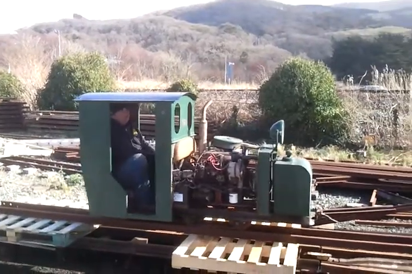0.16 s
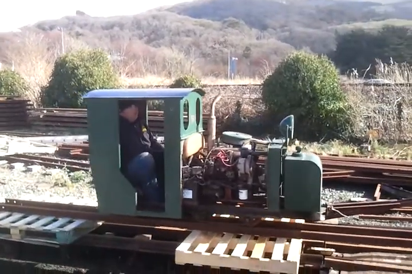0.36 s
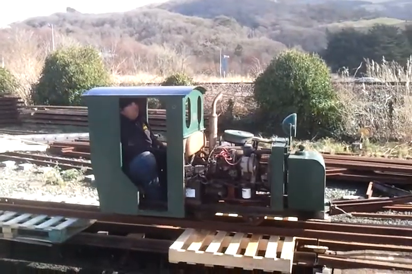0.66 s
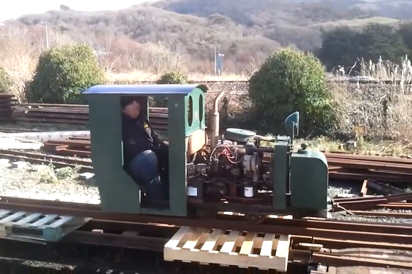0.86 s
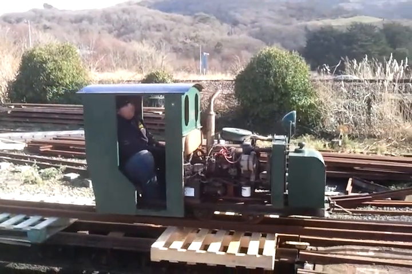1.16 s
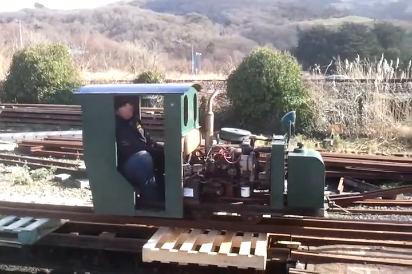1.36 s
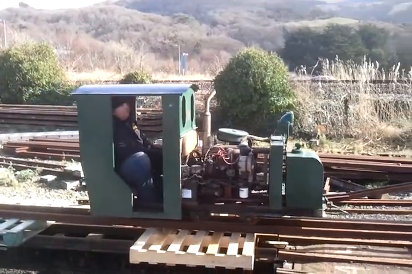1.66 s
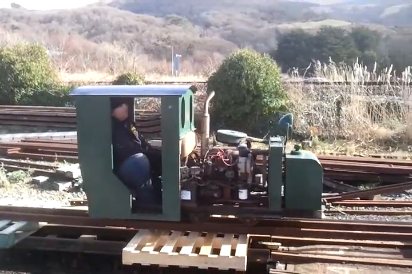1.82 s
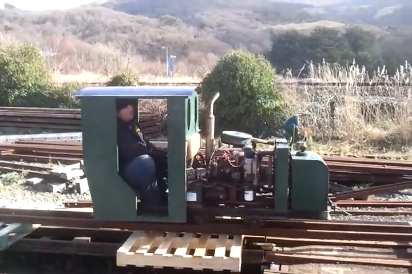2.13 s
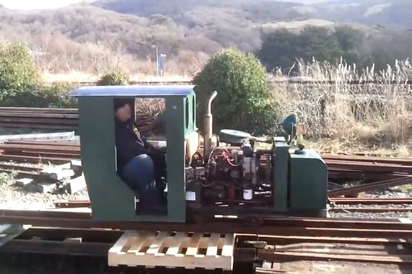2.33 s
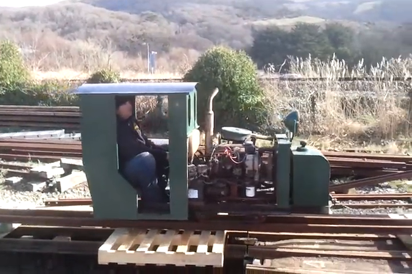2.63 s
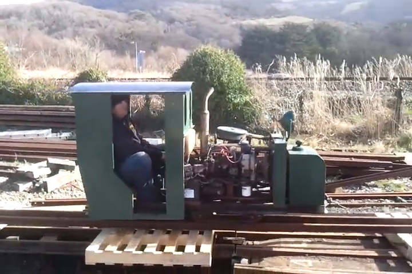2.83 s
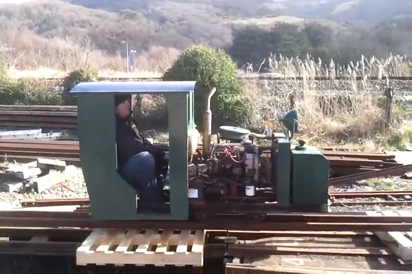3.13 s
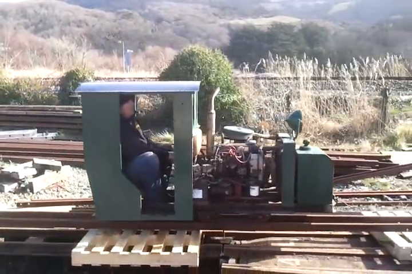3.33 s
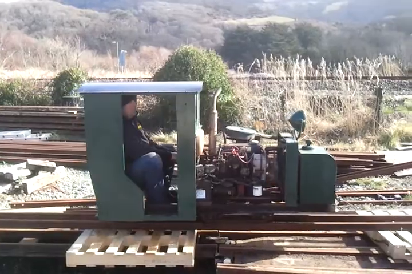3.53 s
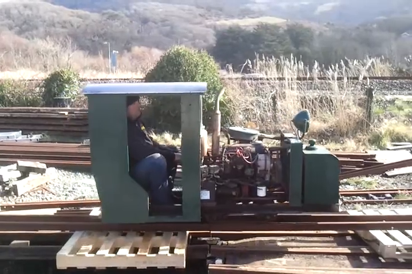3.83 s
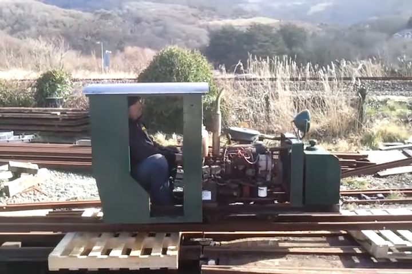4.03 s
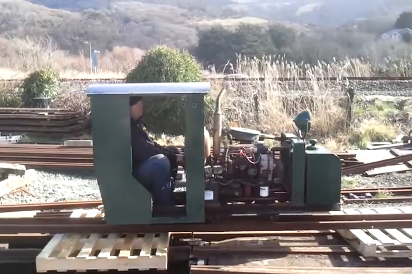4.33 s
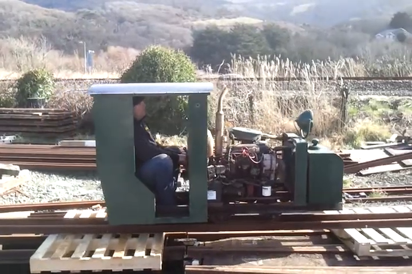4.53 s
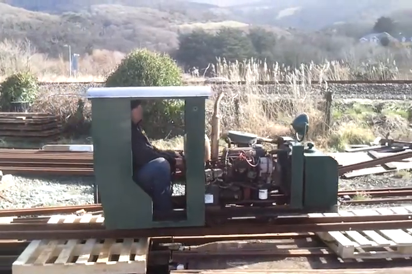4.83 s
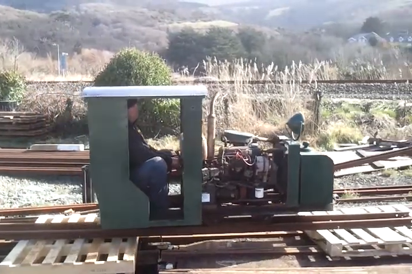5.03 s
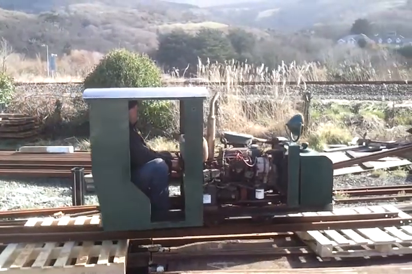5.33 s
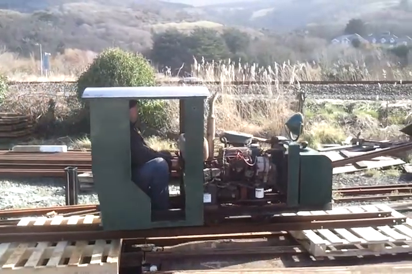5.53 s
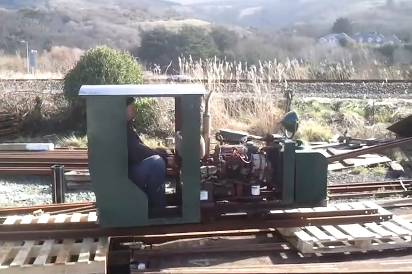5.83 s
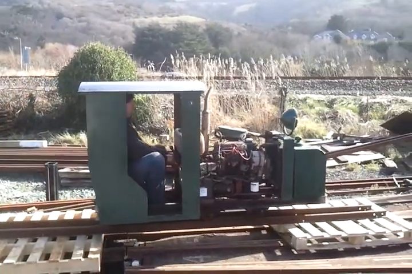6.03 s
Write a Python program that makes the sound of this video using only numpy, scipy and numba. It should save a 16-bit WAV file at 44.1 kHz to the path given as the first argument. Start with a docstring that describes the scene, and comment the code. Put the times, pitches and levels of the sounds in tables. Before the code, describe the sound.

Outdoors in a rail yard, a small diesel locomotive creeps along a few metres from a hand-held microphone. Its low exhaust hum throbs steadily, with mechanical hiss and a hollow metallic knock about sixteen times a second. Small ticks open the scene, and a distant bird chirps twice early on. Wind is light at first, then thumps the microphone from about four seconds, hardest at the end.

```python
"""Diesel locomotive creeping through a rail yard

A small diesel locomotive passes a few metres from a hand-held microphone. Its exhaust hum is a sum of
cosines on the engine's orders, a part that knocks once a cycle is struck resonance, and hiss is shaped noise.
Short ticks, scrapes and clinks ring single modes; a far bird is a frequency-modulated whistle.
Wind is low-passed noise with pressure jumps, hardest at the end."""
import sys
import numpy as np
from scipy import signal
from scipy.fft import rfft, irfft, next_fast_len
from scipy.io import wavfile
from scipy.ndimage import uniform_filter1d
from numba import njit

SR = 44100
rng = np.random.default_rng(int(sys.argv[2]) if len(sys.argv) > 2 else 0)


def persist_wave(psi):
    """Save psi, clipped to +-1, as 16-bit WAV."""
    counts = np.round(np.clip(psi, -1, 1) * 32767).astype(np.int16)
    wavfile.write(sys.argv[1], SR, np.atleast_2d(counts).T)


N = 272097  # length [samples]


def undb(db):
    """Decibel law: amplitude gain of a level in dB."""
    return 10 ** (np.asarray(db) / 20)


def curves(table):
    """Linear interpolation: the columns of a table, joined by straight lines in time."""
    s, *columns = np.transpose(table)
    return [np.interp(np.arange(N) / SR, s, column) for column in columns]


def unit(x):
    """Normalization of a signal to rms 1."""
    return x / np.sqrt(np.mean(x ** 2))


def walk(rate):
    """Slow random modulation: values held 1 / rate s, smoothed by two moving averages, rms 1."""
    hold = int(SR / rate)
    steps = np.repeat(rng.standard_normal(N // hold + 1), hold)
    smooth = uniform_filter1d(uniform_filter1d(steps, hold), hold)
    return unit(smooth[:N])


def ring(blows, hz, t60, contact_s):
    """Damped resonance of moving pitch; a finite contact time makes the ring build up."""
    turn = np.exp(2j * np.pi * np.cumsum(hz) / SR)
    contact = np.hanning(int(contact_s * SR))
    push = np.convolve(blows / turn, contact / contact.sum())[:N]
    decay = np.exp(-np.log(1000) / (t60 * SR))
    return (turn * signal.lfilter([1], [1, -decay], push)).imag


def band(x, hz, width):
    """Resonant band-pass, gain 1 at the centre."""
    return signal.lfilter(*signal.iirpeak(hz, hz / width, fs=SR), x)


@njit
def lowpass(x, hz, damping):
    """State-variable low-pass whose edge moves every sample."""
    y, b, l = np.empty(len(x)), 0., 0.
    for i in range(len(x)):
        g = np.tan(np.pi * hz[i] / SR)
        v = (b + g * (x[i] - l)) / (1 + g * (g + damping))
        y[i] = l + g * v
        b, l = 2 * v - b, 2 * y[i] - l
    return y


def colour(x, table):
    """Spectral shaping by (frequency [Hz], gain [dB]) points, joined over log frequency."""
    size = next_fast_len(N)
    hz, db = np.transpose(table)
    bins_hz = np.arange(size // 2 + 1) * SR / size
    gain = undb(np.interp(np.log(bins_hz + 1), np.log(hz), db))
    return irfft(rfft(x, size) * gain, size)[:N]


# Gusts on the microphone: (middle [s], length [s], level [dB], top of the rumble [Hz])
GUST_SWELLS = [(.005, 0.095, -31.5, 80.6), (.105, 0.12, -24, 65), (0.619, 0.11, -37, 38),
               (3.27, 0.23, -37.5, 50), (3.44, 0.11, -27.5, 41.5), (3.573, 0.11, -35, 50),
               (4.112, 0.07, -25.5, 45.2), (4.242, 0.1, -25, 40), (4.31, 0.073, -30, 80),
               (4.418, 0.14, -27.5, 105), (4.513, 0.095, -18.5, 71), (4.581, 0.065, -26, 45),
               (4.647, 0.061, -31.5, 89), (4.79, 0.19, -27, 60), (4.962, 0.33, -27.5, 119),
               (5.22, 0.066, -20, 60), (5.335, 0.16, -26.5, 60), (5.459, 0.24, -26.5, 70),
               (5.708, 0.3, -29.5, 55), (5.846, 0.19, -28, 149), (5.94, 0.11, -19, 126),
               (6.029, 0.048, -23, 170), (6.072, 0.12, -24.5, 122), (6.115, 0.053, -21, 161),
               (6.16, 0.19, -17.5, 90)]
# The light air between gusts
AIR_DB, AIR_TOP_HZ, AIR_WALK_DB = -47, 92, 2


def gusts():
    """Addition of powers: gusts swell over the light air, and the power-weighted mean sets the rumble top."""
    t = np.arange(N) / SR
    power = undb(2 * (AIR_DB + AIR_WALK_DB * walk(2.88)))
    weighted_hz = power * AIR_TOP_HZ
    for s, length, db, top_hz in GUST_SWELLS:
        swell = undb(2 * db) * np.cos(np.pi * np.clip((t - s) / length, -.5, .5)) ** 2
        power = power + swell
        weighted_hz = weighted_hz + swell * top_hz
    return np.sqrt(power), np.clip(weighted_hz / power, 35, 900)


# Single eddies placed by hand: strong pressure jumps, some with a faint sharp snap on them:
# (time [s], level [dB], time scale of the pressure jump [ms], signed amplitude factor, positive upwards)
PLACED_EDDIES = [(.1185, -19.5, 5.4, -0.88), (4.208, -18.5, 8, 1), (4.3847, -23.3, 2.6, -1.2),
                 (4.4072, -15, 3.3, 1), (4.445, -14.5, 2.5, -1), (4.5127, -22, 1.6, -1),
                 (4.5129, -32, .65, -1), (4.514, -7, 9, -1.08), (4.5672, -13.5, 5.6, 0.92),
                 (4.7547, -12.5, 7.5, 1), (4.804, -12.5, 3.7, 0.88), (4.9242, -17.8, 5.6, 1),
                 (4.939, -16, 2, -1.1), (4.9385, -35, .7, -1), (4.9559, -13.5, 5.3, 1),
                 (4.97, -15, 2.6, -1), (4.9885, -18, 1.7, -1), (5.1404, -23, 2.2, -1),
                 (5.2235, -19, 2.3, -1), (5.2305, -11.5, 7.3, -0.88), (5.2873, -20, 5, 1),
                 (5.3264, -23, 3.8, -1.1), (5.4144, -18, 2.4, 0.94), (5.4145, -31, .7, 1),
                 (5.4885, -23, 3.2, 0.81), (5.8, -15.5, 2.6, -1.08), (5.8203, -15, 2.2, -1.1),
                 (5.837, -17, 3.6, 1), (5.885, -18.5, 2.9, 0.91), (5.916, -16, 3.2, -0.86),
                 (5.9227, -5, 6.6, 1), (5.935, -11, 2.6, -1.2), (5.9407, -7.5, 2.5, 1),
                 (5.9536, -3, 2.52, -0.84), (5.9537, -26, .7, -1), (6.0235, -15, 1.8, 1),
                 (6.0326, -10.5, 3.5, -0.95), (6.0525, -13, 3.7, -1), (6.0623, -8.5, 3.9, 1),
                 (6.0757, -16, 3.9, 1), (6.095, -10.5, 2.9, -1), (6.1066, -5.5, 4.4, -1.3),
                 (6.1411, -10.5, 3.2, 0.95), (6.1599, -13, 4.8, -1)]
# Small eddies come by chance: level relative to the gust, mean time scale at a rumble top of 95 Hz
SMALL_EDDIES_PER_S, SMALL_EDDY_DB, SMALL_EDDY_MS = 12, 1.5, 2.6
# Sharp gusts flutter above their rumble
FLUTTER_DB, FLUTTER_HZ, FLUTTER_FROM_HZ = -5, (220, 380), 72.6


def wind():
    """Turbulence: low-passed noise, brighter in sharp gusts, and single eddies as pressure jumps."""
    strength, top_hz = gusts()
    high_pass = signal.butter(2, 21, "high", fs=SR, output="sos")
    air = signal.sosfilt(high_pass, rng.standard_normal(N))
    # the gain offsets the power lost to a lower edge
    rumble = lowpass(lowpass(air, top_hz, 1.0), 3.96 * top_hz, 1.5) * np.sqrt(SR / 2 / top_hz)
    throb_db = 2.6 * walk(40)
    flutter_band = signal.butter(3, FLUTTER_HZ, "band", fs=SR, output="sos")
    flutter = unit(signal.sosfilt(flutter_band, air)) * undb(FLUTTER_DB + 3.8 * walk(70))
    sharpness = np.clip(top_hz / FLUTTER_FROM_HZ - 1, 0, 1)
    out = (rumble * undb(throb_db) + flutter * sharpness) * strength

    when, length = rng.random((int(SMALL_EDDIES_PER_S * N / SR), 2)).T
    when = .06 + when * (N / SR - .07)
    then = (when * SR).astype(int)
    small_db = 20 * np.log10(strength[then]) + SMALL_EDDY_DB
    # a dull gust carries slower eddies
    small_ms = SMALL_EDDY_MS * (.5 + length) * 95 / top_hz[then]
    small_way = np.sign(rng.standard_normal(len(when)))
    small = zip(when, small_db, small_ms, small_way)

    t = np.arange(-SR // 20, SR // 20) / SR
    for s, peak_db, jump_ms, way in list(PLACED_EDDIES) + list(small):
        # pressure builds, flips quickly and relaxes
        u = t * 1000 / jump_ms
        jump = np.tanh(u / 0.51) * np.exp(-(u / 0.61) ** 2)
        at = int(s * SR) - SR // 20
        out[at:at + len(t)] += (way * undb(peak_db) * jump / jump.max())[:N - at]
    return out


# Notes of a far bird: (time [s], length [s], pitch [Hz], level [dB])
BIRD_NOTES = [(1.443, 0.075, 4160, -61), (1.698, 0.076, 4150, -55), (5.172, .055, 4190, -62),
              (5.236, 0.058, 4150, -62.5)]
SLIDE_UP_HZ, SLIDE_S = 330, .009  # each note slides up into its pitch


def bird():
    """Frequency modulation: short whistles with a quick warble."""
    out = np.zeros(N)
    for s, length, hz, db in BIRD_NOTES:
        t = np.arange(int(length * SR)) / SR
        slide = SLIDE_UP_HZ * SLIDE_S * np.exp(-t / SLIDE_S)
        warble = 0.96 * np.sin(2 * np.pi * 45 * t)
        whistle = np.sin(2 * np.pi * (hz * t + slide + warble))
        envelope = np.sin(np.pi * t / length) ** .5 * undb(2.7 * walk(90)[:len(t)])
        out[int(s * SR):int(s * SR) + len(t)] += undb(db) * whistle * envelope
    return out


# Short high ticks and scrapes, a cluster of them at the very start, and ringing clinks:
# (time [s], tone level [dB], mode [Hz], decay time t60 [s], scrape level relative to the tone [dB])
TICKS_AND_CLINKS = [(0.013, -51.5, 10755, 0.33, 5), (.008, -43, 11800, 0.01079, 4),
                    (0.013, -52.5, 5800, 0.1046, 9.5), (0.051, -48, 8700, .02, 6),
                    (.074, -46.5, 4820, .03, 5.5), (.83, -48.5, 614, 0.94, -6), (2.289, -46, 2090, 0.04, 4),
                    (3.953, -48, 5541, 0.0343, -6), (4.065, -44, 2811, .05, -8),
                    (4.191, -48, 2179, 0.11, 13), (5.386, -43, 5230, 0.04, -8),
                    (5.387, -38.5, 4980, 0.04, -8), (5.393, -39, 5030, 0.039, -11),
                    (5.391, -51, 1880, 0.12, 17), (5.391, -62, 6000, 0.1305, -3), (5.46, -52, 5000, .08, 2),
                    (5.462, -62, 2300, .12, 17), (5.465, -51.5, 2985, 0.19, 7), (5.51, -59, 3700, .12, 0),
                    (5.547, -54, 5000, .04, 2), (5.55, -59, 2210, .1, 16), (5.553, -55, 2970, .07, 0),
                    (5.64, -52, 11060, .02, -6)]


def clinks():
    """Modal excitation: each tick is a decaying mode with a short scrape of noise around it."""
    out = np.zeros(N)
    for s, peak_db, hz, t60, scrape_db in TICKS_AND_CLINKS:
        t = np.arange(int(t60 * SR)) / SR
        scrape = undb(scrape_db) * rng.standard_normal(SR)[:len(t)] * np.exp(-t / min(0.32 * t60, .025))
        scrape = band(band(scrape, hz, 0.83 * hz), hz, 0.83 * hz)
        tone = np.sin(2 * np.pi * hz * t) * np.exp(-np.log(1000) * t / t60)
        out[int(s * SR):int(s * SR) + len(t)] += undb(peak_db) * (tone + scrape)
    return out


# Engine speed: (time [s], rate [engine cycles per second])
ENGINE_SPEED = [(0, 16.4), (.56, 16.2), (.66, 15.67), (.8, 15.68), (1.15, 15.968), (1.5, 16.449),
                (2, 16.779), (2.5, 16.864), (3, 16.644), (3.5, 16.83), (4, 16.77), (4.4, 16.705),
                (4.75, 16.701), (5.1, 16.553), (5.35, 17.338), (5.6, 17.785), (5.9, 17.9), (6.17, 18)]
START_CYCLE = .723  # phase before the first sample [cycles]


def engine_cycle():
    """Phase as the integral of frequency: engine cycles turned so far."""
    return START_CYCLE + np.cumsum(curves(ENGINE_SPEED)[0]) / SR


# Spectrum of engine hiss and clatter: (frequency [Hz], relative density [dB per Hz])
HISS_SPECTRUM = [(110, -7), (160, -9.5), (300, -10.5), (440, -17.5), (1050, -24.5), (2500, -31),
                 (3400, -37), (6100, -28.5), (6700, -33), (7800, -34), (8500, -41), (10300, -37.5),
                 (11500, -40.5), (12100, -51.5), (14500, -58)]
# Broad casing resonances in the hiss: (centre [Hz], width [Hz], relative level [dB])
CASING_MODES = [(530, 92, -13), (653, 81, -9), (1420, 226, -9), (1598, 140, -11.5), (2136, 190, -12),
                (2446, 100, -17)]
# Valve and injector ticks that lift the treble: (share of the cycle [1], mean lift [dB])
VALVE_TICKS = [(.08, 2), (0.251, 5.5), (0.399, 3.5), (.92, 4.5)]
TICK_FADE_CYCLES = 0.088


def hiss(cycle):
    """Amplitude-modulated noise: gritty bands flicker separately and valve ticks lift the treble."""
    tick_db = 0
    for share, lift_db in VALVE_TICKS:
        # every tick has its own strength
        strengths = .4 + 1.2 * rng.random(N // 1000)
        strength = strengths[np.floor(cycle - share + 1).astype(int)]
        tick_db = tick_db + strength * lift_db * np.exp(-((cycle - share) % 1) / TICK_FADE_CYCLES)
    tick_db = uniform_filter1d(tick_db - tick_db.mean(), size=40)
    # each firing puffs, weakest near the turn of the cycle
    puff_db = 1.6 * np.cos(8 * np.pi * cycle) + 0.92 * np.cos(2 * np.pi * (cycle - .45))

    out, swell = 0, walk(1.91)
    for hz in 140 * 2 ** np.arange(0, 7, .5):
        grit = undb(1.2 * np.repeat(rng.exponential(size=N // 64 + 1), 64)[:N])
        beat_db = np.clip(hz / 2500, 0, 1) ** 2 * tick_db
        beat_db = beat_db + np.exp(-np.log2(hz / 600) ** 2) * puff_db
        noise = band(band(grit * rng.standard_normal(N), hz, 1.2 * hz), hz, 1.2 * hz)
        out = out + undb(.3 * swell + 1.1 * walk(14) + beat_db) * noise

    casing = 0
    for hz, width, db in CASING_MODES:
        beat_db = puff_db if hz < 1000 else tick_db
        resonance = unit(band(rng.standard_normal(N), hz, width))
        casing = casing + undb(db + 1.33 * walk(15) + beat_db) * resonance
    return unit(colour(out, HISS_SPECTRUM)) + colour(casing, [(100, -1.5), (2700, -1.5), (3300, -31.0)])


# High, middle and low mode of the knocking part: (decay time t60 [s], contact time [s])
KNOCK_MODES = [(.075, .008), (.05, .005), (.05, .004)]
# Lighter knocks later in the cycle: (share of the cycle [1], level before looseness and chance [dB])
REBOUNDS = [(.42, -9), (.58, -19), (.8, -19)]
# Drive of the part: (time [s], level of the high mode [dB], looseness of rebounds and grinding [dB])
KNOCK_DRIVE = [(0, -45, 6), (.3, -47, .5), (.55, -44, 2), (.66, -42.5, 7), (.88, -37.5, -2), (1.1, -43, -8),
               (1.4, -43, -1), (1.65, -36, 1), (1.9, -36, -5), (2.06, -39, -6), (2.17, -33.5, -7),
               (2.35, -33.5, -9), (2.75, -36, -5), (3, -38, -3), (3.4, -41, 1.5), (3.7, -47, 8),
               (4.2, -47, 5.5), (4.65, -41.5, 7), (4.9, -48, 3), (5.05, -63, 2), (5.4, -43, 11),
               (5.8, -52, 3), (6.17, -43.5, 1)]
# Its modes shift as it rolls by: (time [s], high mode [Hz], middle mode [Hz], low mode [Hz],
# middle level [dB], low level [dB], lateness [cycles])
KNOCK_SHIFT = [(0, 1600, 1550, 1310, -55, -43, 0.025), (.7, 1598, 1510, 1294, -58, -45.5, 0.02),
               (1.4, 1589, 1544, 1315, -53, -44, -0.0034), (1.8, 1596, 1540, 1350, -54, -43.5, 0.0048),
               (2.5, 1598, 1557, 1360, -44, -42, -0.0037), (3.3, 1602, 1550, 1380, -42, -43.5, 0.0054),
               (3.8, 1608, 1554, 1360, -41, -48, -.03), (4.4, 1600, 1529, 1370, -48, -44, -0.078),
               (4.9, 1596, 1526, 1343, -50, -44.5, -0.0003), (5.3, 1612, 1490, 1310, -60, -49, 0.056),
               (5.6, 1620, 1448, 1240, -50, -48, 0.039), (5.85, 1636, 1496, 1310, -49, -39.5, 0.00037),
               (6.17, 1590, 1530, 1340, -46, -45, -0.048)]


def knock(cycle):
    """Impact excitation: one blow a cycle and lighter rebounds, of varying strength, ring the modes."""
    high_db, loose_db = curves(KNOCK_DRIVE)
    *mode_hz, middle_db, low_db, late = curves(KNOCK_SHIFT)
    cycle = cycle - late
    out, loose = 0, undb(loose_db)
    for (t60, contact_s), hz, db in zip(KNOCK_MODES, mode_hz, (high_db, middle_db, low_db)):
        blows = np.zeros(N)
        for share, rebound_db in [(0, 0)] + list(REBOUNDS):
            at = np.flatnonzero(np.diff(np.floor(cycle - share)))
            reach = 1
            if share:
                # looseness feeds the first rebound most; rebounds reach the low mode at half strength
                reach = loose[at] ** (1 if share < .5 else .3) * (.5 if hz[0] < 1400 else 1)
            chance_db = 1.1 * rng.standard_normal(N // 1000)[:len(at)]
            blows[at] = undb(rebound_db + chance_db) * reach
        # the parts grind on after each blow
        sliding = signal.lfilter([1], [1, -np.exp(-1 / (0.023 * SR))], blows)
        grind = undb(-43) * np.sqrt(loose) * ring(sliding * rng.standard_normal(N), hz, 0.046, 0.0027)
        struck = ring(blows, hz * (1 + 0.0041 * walk(12)), t60, contact_s)
        out = out + undb(db) * (struck + grind)
    return out


# Orders of the exhaust hum: (multiple of the cycle rate [1], relative level [dB])
HUM_ORDERS = [(1, -28), (2, -2), (3, -25), (4, 0), (5, -30), (6, -8), (7, -28), (8, -2), (9, -27),
              (10, -15), (11, -27), (12, -16), (13, -30), (14, -20), (15, -27), (16, -29), (17, -27),
              (18, -26), (19, -24), (20, -12), (21, -27), (22, -25), (31, -29), (32, -24), (40, -28)]
# Level of the exhaust as it rolls by:
# (time [s], hum level [dB], lift of the eighth multiple [dB], lift of the pipe's top lines [dB])
EXHAUST_ROLL = [(0, -36.5, -2, -10), (.5, -37.5, 0, -4), (.6, -38.5, -4.5, -7), (.68, -35.5, 0, -14),
                (1, -36, -1.5, -8), (1.5, -38.5, 0, -3), (2, -39.5, -1, -1.5), (2.35, -37.5, 2.5, 2.5),
                (2.7, -39, -1.5, 0.5), (4, -39.5, 3.5, 4), (5, -35.5, 3.5, -1.5), (5.25, -35.5, 2.5, 5),
                (5.5, -37.5, 4.5, -9.5), (6.17, -36.5, 8, -9)]


def exhaust(cycle):
    """Harmonic synthesis: lines on the engine orders waver in level and timing, the weak ones most."""
    hum_db, eighth_db, top_db = curves(EXHAUST_ROLL)
    lift_db = {8: eighth_db, 19: top_db, 20: top_db, 21: top_db}
    out = 0
    for k, db in HUM_ORDERS:
        waver = 1. if db > -13 else 2.0
        # the top lines belong to one puff a cycle that rings the pipe, so they peak together
        start = -.4 * k if k > 16 else rng.random()
        if k <= 10 and k % 2 == 0:
            # firing lines share a phase; shaft lines are delayed by a tenth of a cycle and a fixed phase
            start = -.35 if k % 4 == 0 else -.1 * (k + 1)
        angle = 2 * np.pi * (k * cycle + start) + .15 * waver * walk(6)
        line_db = db + lift_db.get(k, 0) + waver * walk(5.0)
        out = out + np.sqrt(2) * undb(line_db) * np.cos(angle)
    return undb(hum_db) * out


HISS_DB, HISS_RISE_DB_PER_S = -47.5, 0.27  # level halfway through, and its steady rise


def scene():
    """Superposition: wind, yard and engine add at one microphone."""
    cycle = engine_cycle()
    hiss_db = HISS_DB + HISS_RISE_DB_PER_S * (np.arange(N) - N / 2) / SR
    engine = undb(hiss_db) * hiss(cycle) + knock(cycle) + exhaust(cycle)
    return (wind() + bird() + clinks() + engine)[None]


TOP_HZ = 14578  # upper edge of the recorder's pass band


def record(dry):
    """Saturation and band-limiting: the recorder rounds the loudest peaks and cuts the top."""
    rounded = 0.96 * np.tanh(dry / 0.92)
    return signal.sosfilt(signal.ellip(8, .2, 70, TOP_HZ, fs=SR, output="sos"), rounded)


dry = scene()
out = record(dry)
persist_wave(out)
```